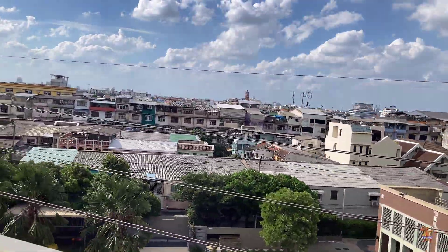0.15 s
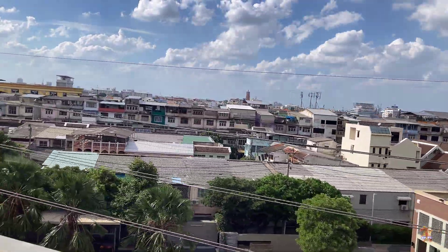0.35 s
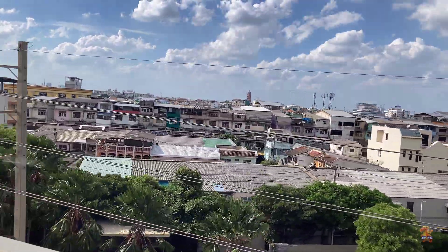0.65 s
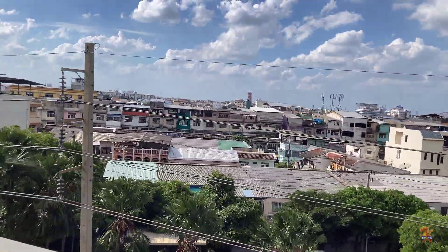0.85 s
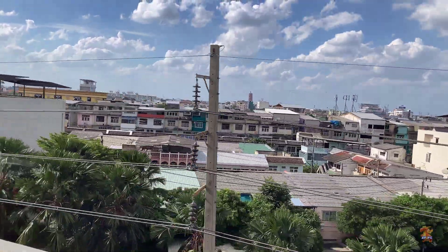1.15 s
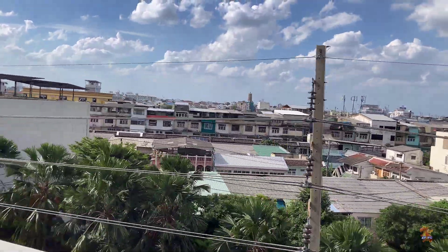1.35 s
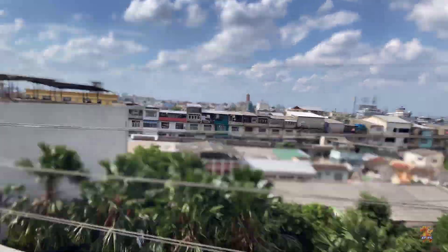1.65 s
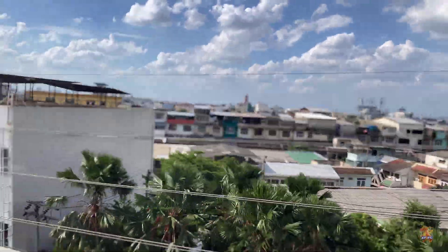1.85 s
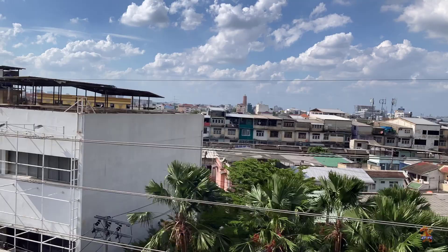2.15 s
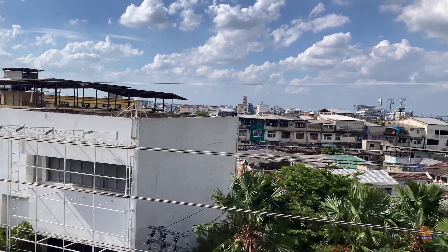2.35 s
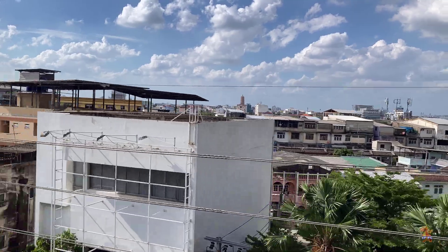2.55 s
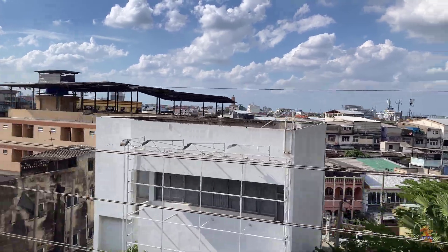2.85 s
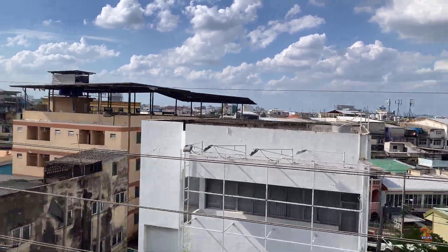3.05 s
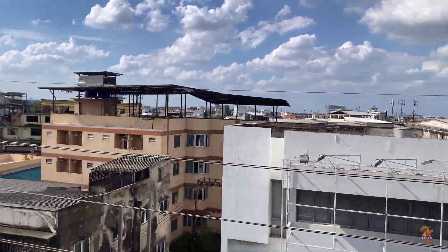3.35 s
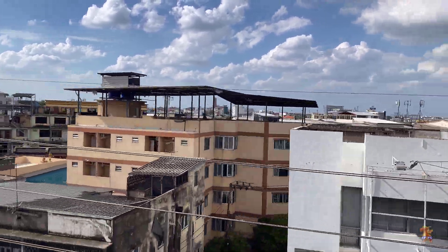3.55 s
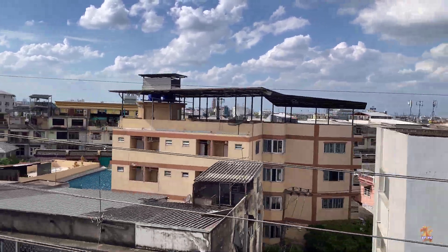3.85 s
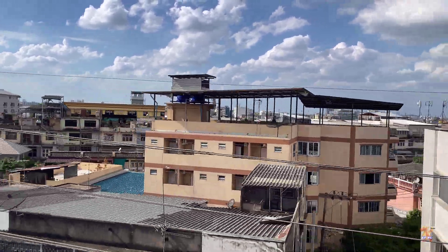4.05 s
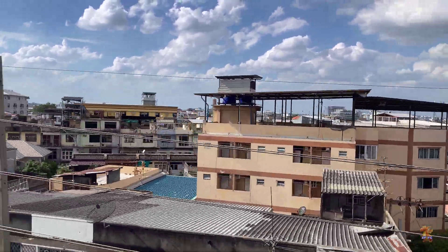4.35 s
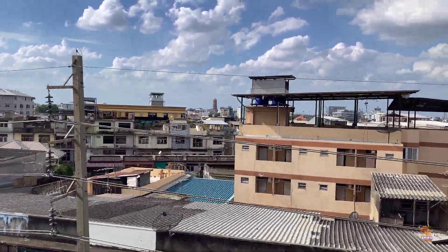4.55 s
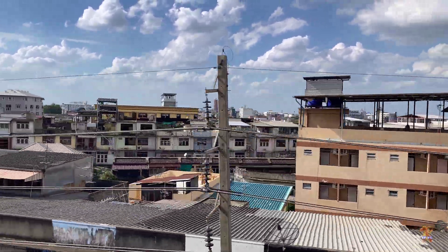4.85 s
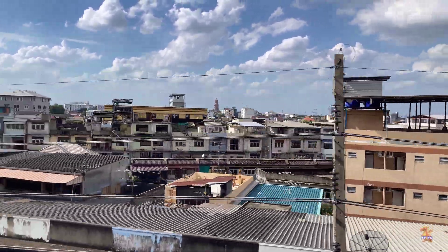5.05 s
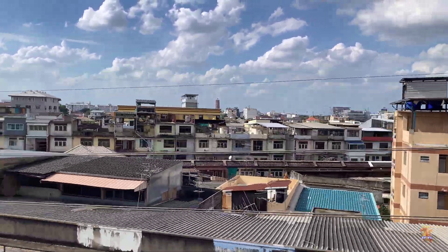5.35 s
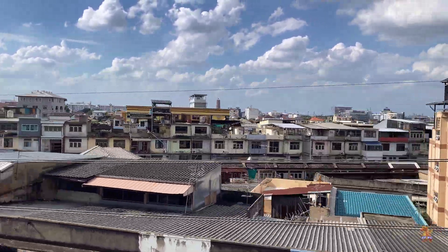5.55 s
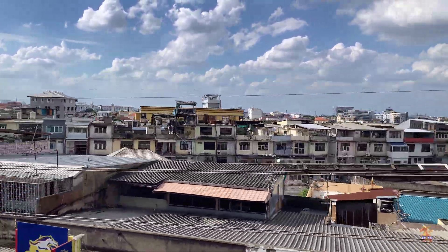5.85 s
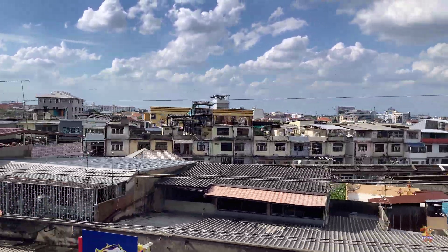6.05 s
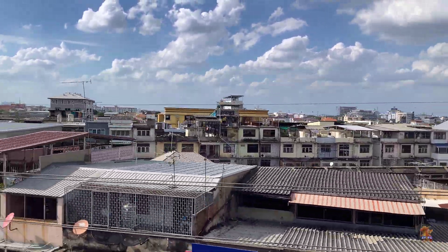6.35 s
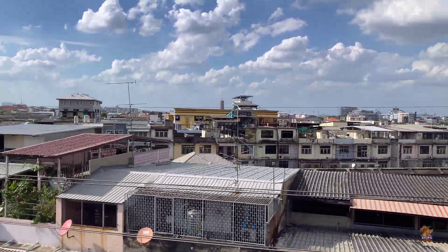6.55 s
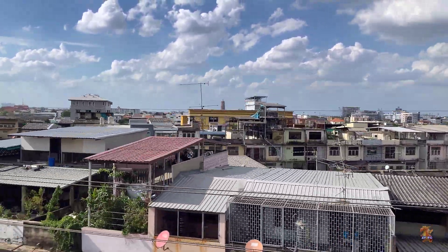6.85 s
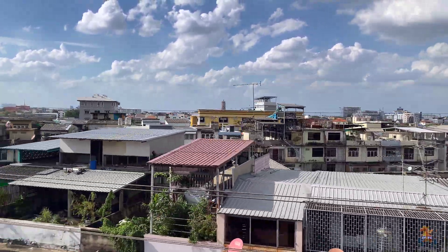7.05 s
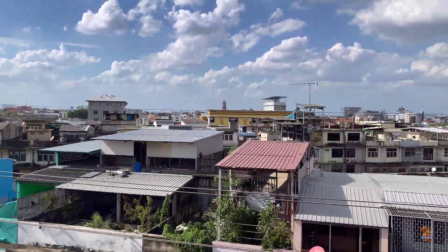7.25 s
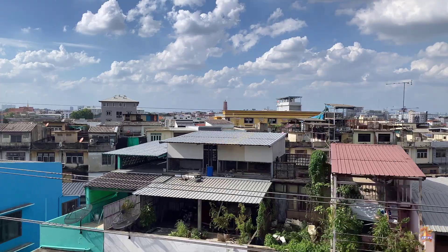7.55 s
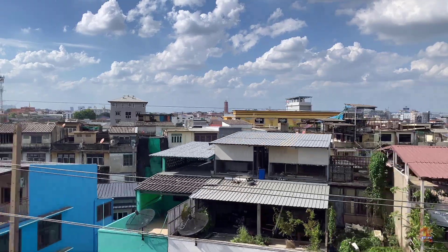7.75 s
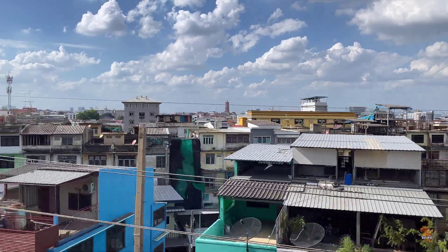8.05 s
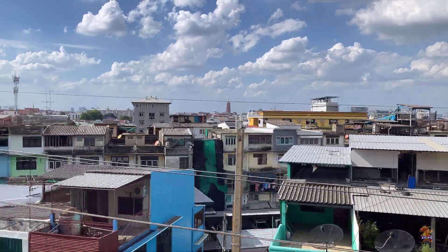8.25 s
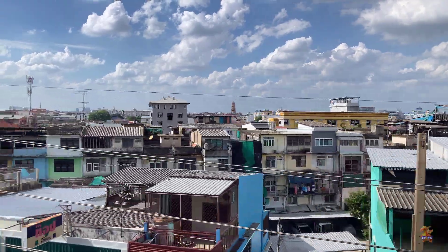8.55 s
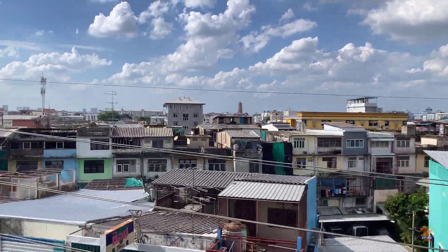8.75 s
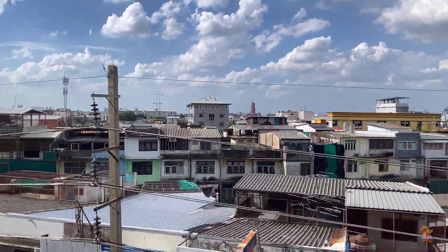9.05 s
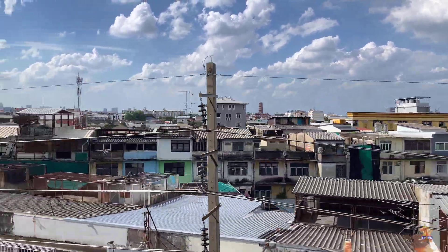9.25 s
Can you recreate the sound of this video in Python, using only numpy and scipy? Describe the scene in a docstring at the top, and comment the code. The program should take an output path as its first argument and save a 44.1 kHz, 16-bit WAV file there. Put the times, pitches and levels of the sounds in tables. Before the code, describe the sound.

Inside a moving elevated train: deep droning floor rumble, soft wheel roar and air hiss, faint motor whine, small trim ticks, and one sharp body knock.

```python
"""The car body of an elevated train rumbles: low noise of floor and panels, with booms, lulls and rough track.
Recorded inside, on a phone held at the window: wheel roar and air hiss are shaped noise around its two ports.
A compressor hums in steady shaft orders; a faint pair of drive tones rises and fades.
Wheels ring as narrow noise and wavering tones, and the running gear rubs in swells of filtered noise.
Up close, trim ticks in noise bursts, plastic snaps in clicks, and the body knocks in single pressure dips."""
import sys
import numpy as np
from scipy import signal
from scipy.fft import rfft, irfft, next_fast_len
from scipy.io import wavfile
from scipy.ndimage import uniform_filter1d

SR = 44100
rng = np.random.default_rng(int(sys.argv[2]) if len(sys.argv) > 2 else 0)


def wav_out(sig):
    """Save sig, one row per channel (or a flat mono array), as 16-bit PCM at SR to the path in sys.argv[1]."""
    wavfile.write(sys.argv[1], SR, np.round(np.clip(np.atleast_2d(sig).T, -1, 1) * 32767).astype(np.int16))


N = 414099
T = np.arange(N) / SR  # time [s]
HZ = np.fft.rfftfreq(N, 1 / SR)  # frequency [Hz]

# Spectra of the running noise in the carriage: (frequency [Hz], relative density [dB])
FLOOR_SPECTRUM = [(15, -14), (35, -26), (43, -16.5), (47, 4), (53, -6.5), (63, 0.3), (73, -5.5), (83, -0.5),
                  (93, -13.5), (130, -29), (400, -120)]
PANEL_SPECTRUM = [(60, -49), (97, 0.5), (130, -0.5), (170, -3.5), (184, -7.5), (207, -7.5), (224, -16),
                  (330, -38), (900, -120)]
WHEEL_SPECTRUM = [(120, -31), (200, -15), (240, 0.5), (275, -3), (322, -0.5), (390, -7.5), (460, -11),
                  (600, -12), (720, -18.5), (830, -15), (950, -29.5), (1500, -38), (4000, -120)]
AIR_SPECTRUM = [(500, -35), (850, -2), (1030, 1), (1300, -3), (1900, -7), (2350, -10.5), (2950, -12),
                (4200, -16), (5200, -19), (7700, -25.5), (8500, -25.5), (12000, -30), (15400, -38.5),
                (16200, -52.5)]
# Floor booms as the car rocks: (time [s], extra level [dB]), with a shared rise and fall
FLOOR_BOOMS = [(.17, 3), (3.6, 2), (4.27, 1.5), (4.93, 4.5), (6.3, 4), (6.93, 3.5), (8.08, 2), (8.85, 2)]
BOOM_S = 0.12
# Brief sinkings of the rumble between its surges: (time [s], floor level change [dB]), shared fall and rise
RUMBLE_LULLS = [(.5, -5), (1.24, -5), (1.61, -2.5), (2.9, -5.5), (5.5, -1.5), (7.22, -2.5), (7.34, -1),
                (7.88, -5), (9.03, -4)]
LULL_S = 0.049
# Rough stretches of track: (roughest time [s], rise [s], fall [s], shaking before each source's share [dB])
ROUGH_STRETCHES = [(2.1, .4, 0.83, 1.8), (3.2, 0.27, 0.26, 2.5), (4.83, 0.41, 0.24, 1.5),
                   (6.32, 0.43, 0.16, 2), (7.3, 1, 0.87, 2.5)]
# Compressor orders between their swells: (multiple of shaft speed [1], level [dB])
HUM_ORDERS = [(3, -37.5), (4, -34), (6, -45)]
# Swells of single orders in the standing waves of the carriage:
# (start [s], end [s], multiple of shaft speed [1], added level [dB])
ORDER_SWELLS = [(0.095, 0.7, 4, -31.5), (1.0, 1.49, 4, -33), (2, 3.6, 3, -45.5), (2.85, 5, 4, -37.5),
                (6.5, 7.2, 4, -37), (7.1, 9.1, 3, -37.5), (7.5, 8.42, 4, -35.5), (.1, 3.3, 6, -45.5)]
SHAFT_HZ = 47.94  # mean shaft speed
# Rubs and swells of the running gear: (time [s], length [s], centre [Hz], width [Hz], level [dB])
GEAR_RUBS = [(.02, .2, 2200, 3200, -50), (.6, 2.1, 680, 220, -44.5), (2.4, 0.75, 356, 130, -38.5),
             (2.92, 0.065, 2600, 350, -48), (3.038, .04, 900, 190, -35), (3.057, 0.053, 2500, 700, -49),
             (3.1, .14, 950, 900, -42), (3.388, 0.092, 480, 130, -39), (4.124, 0.29, 528, 91, -38.5),
             (4.68, 0.22, 1390, 900, -44.5), (4.803, .3, 3400, 2500, -56), (5.2, 0.61, 480, 200, -43),
             (5.547, 0.18, 298, 100, -30.5), (6.356, 0.18, 1500, 1300, -51), (6.36, .15, 560, 400, -39),
             (6.65, .12, 560, 200, -37), (6.7, .2, 1800, 900, -57), (6.787, .16, 690, 250, -39),
             (6.974, 0.12, 2820, 500, -50.5), (7.595, 0.098, 520, 90, -40), (9.004, .35, 2400, 1400, -54),
             (9.33, 0.16, 2240, 500, -45)]
RING_HZ, RING_WIDTH_HZ = 1018, 33  # faint steady wheel ringing
# Drive whine swells: (start [s], end [s], starting level [dB], growth [dB/s])
WHINE_SWELLS = [(.05, 0.45, -46, 14), (0.45, 1.5, -40.4, -6.3), (1.98, 2.25, -51, 10),
                (3.68, 5.74, -48.2, 4.4), (8.15, 8.85, -49, -5), (8.85, 9.39, -44.5, 4)]
# Mean pitch of the first drive motor: (time [s], frequency [Hz])
WHINE_PITCH = [(0, 834), (.45, 845), (1.15, 850), (2.1, 845), (3.8, 835), (4.5, 838), (5.1, 844.5),
               (5.4, 849.5), (5.75, 854), (8.1, 836), (8.8, 838), (9.4, 843)]
SECOND_MOTOR_HZ = 12  # how far the second motor runs below the first
# Clearest ticks of loose trim: (time [s], relative burst level [dB])
CLEAR_TICKS = [(0.0737, -43.5), (0.2748, -42.5), (0.5477, -46), (0.833, -48), (1.3583, -50), (1.6841, -44),
               (1.718, -42), (2.2074, -46), (2.3616, -40), (3.2226, -45), (3.8511, -47), (3.9484, -46),
               (4.8539, -48), (4.9222, -43), (5.2884, -44), (6.1988, -45), (6.3984, -46), (6.9336, -44),
               (7.0833, -41.5), (7.4669, -42.5), (8.3888, -44), (8.6393, -44.5), (8.8355, -46),
               (8.928, -44), (8.9755, -44.5), (9.1487, -45)]
# Range of the random faint ticks: (weakest [dB], strongest [dB]), relative burst levels
FAINT_TICK_RANGE = (-56, -48)
# Colour of the trim ticks: (frequency [Hz], relative level [dB])
TICK_SPECTRUM = [(1000, -2), (2800, 5), (6000, -7), (6750, -2), (7200, 0), (7700, -2.5), (11000, -6),
                 (15400, -13), (16500, -29)]
# Wheels singing out: (start [s], end [s], pitch [Hz], starting level [dB], growth [dB/s],
# roughness [0-1], left minus right [dB], phase by which left leads [rad])
WHEEL_SONGS = [(1.41, 1.72, 1027, -45.5, 6, .3, -3, -2.2), (3.12, 4.55, 620, -47, -1.6, .4, 8, -1.5),
               (4.66, 4.79, 1020, -42.5, 0, .6, 1, 2.2), (7.92, 8.2, 1010, -46.5, -10, .6, 4, 2.2)]
# Dull knocks of the car body: (time [s], relative peak [dB], pitch [Hz])
BODY_KNOCKS = [(1.7195, -23, 400), (1.7233, -8.5, 225), (1.734, -6.5, 80), (2.849, -13, 219),
               (3.056, -11, 110), (3.075, -17, 267), (5.115, -13, 231), (6.325, -16, 240),
               (7.594, -19, 220), (8.837, -16.5, 259)]
# Crackle of plastic close by: (time [s], relative level [dB])
PLASTIC_SNAPS = [(1.7236, -29), (1.7351, -18.5), (1.763, -37), (1.776, -36), (1.7874, -32), (1.799, -32.5)]
# Colour of the plastic snaps: (frequency [Hz], relative level [dB])
SNAP_SPECTRUM = [(1000, -10), (2700, -5), (5000, -4), (7500, -4), (9300, 1), (11200, 5), (15400, 1),
                 (17000, -9)]
# Likeness of the two microphone ports: (frequency [Hz], likeness [0-1])
PORT_LIKENESS = [(60, .989), (120, .97), (190, .9), (300, .8), (420, .72), (530, 0), (700, 0), (800, .45),
                 (1050, .5), (1700, .4), (2100, .2), (2300, 0), (6350, 0), (6800, .95)]
# Phase between the ports, used below 4 kHz for noise: (frequency [Hz], phase by which left leads [rad])
PORT_LEAD = [(40, .22), (65, .27), (100, .18), (220, .12), (350, .6), (560, 1.1), (850, 1.7), (1020, 3.75),
             (2000, 4.1)]
# Level between the ports: (frequency [Hz], left minus right [dB])
PORT_BALANCE = [(60, -1.6), (150, -.8), (290, 0), (370, -2.5), (540, 4), (850, 2), (1020, .5), (1400, 2.7),
                (2200, .7), (8000, 0)]
PORT_LAG_S = .00022  # lag between the ports in the treble
EDGE_HZ = 16500  # upper band edge of the phone


def gain_of(db):
    """Decibels to an amplitude factor."""
    return 10 ** (np.asarray(db) / 20)


def evened(x):
    """Scales to an rms of 1."""
    return x / np.sqrt(np.mean(x ** 2) + 1e-20)


def read(points, hz=HZ):
    """Reads a spectrum table on a log-frequency axis."""
    f, value = np.transpose(points)
    return np.interp(np.log(hz + 1), np.log(f + 1), value)


def coloured(x, gain):
    """Filters by a gain given at every frequency."""
    size = next_fast_len(N)
    hz = np.fft.rfftfreq(size, 1 / SR)
    return irfft(rfft(x, size) * np.interp(hz, HZ, gain), size)[..., :N]


def drift(rate_hz):
    """Smooth random wandering of rms 1."""
    knots = rng.standard_normal(4000)
    knots = uniform_filter1d(uniform_filter1d(knots, size=4), size=4)
    return evened(np.interp(T * rate_hz * 8, np.arange(4000), knots))


def swell(peak_s, rise_s, fall_s):
    """A smooth rise to 1 and a smooth fall."""
    away = (T - peak_s) / np.where(T < peak_s, rise_s, fall_s)
    return np.exp(-np.minimum(away ** 2, 20))


def held(start_s, end_s, db, db_per_s, edge_s):
    """A tone's envelope: soft attack, a hold that grows or sinks steadily, soft release."""
    gate = (1 + np.tanh(np.minimum(T - start_s, end_s - T) / edge_s)) / 2
    return gate * gain_of(db + db_per_s * (np.clip(T, start_s, end_s) - start_s))


def noise(db):
    """Two unrelated noises with the given spectrum, together of rms 1."""
    return evened(coloured(rng.standard_normal((2, N)), gain_of(db)))


def band(hz, width_hz):
    """Noise ringing in one resonance."""
    offset = (HZ - hz) / (0.63 * width_hz)
    return noise(-20 * np.log10(1 + offset ** 2))


def steadied(x, steadiness):
    """Evens out the slow swings of a narrow noise, as in a vibration that is driven without pause."""
    power = uniform_filter1d(uniform_filter1d(x ** 2, size=4000), size=3000)
    return evened(x / power ** (min(steadiness, 1) / 2))


def patchy(x, patchy_db):
    """Small patches of pitch and time swell and sink on their own."""
    z = signal.stft(x, nperseg=1024, noverlap=768)[2]
    patches = rng.standard_normal(z.shape[1:])
    patches = uniform_filter1d(patches, size=4, axis=0)  # across pitch
    patches = evened(uniform_filter1d(patches, size=14, axis=1))  # across time
    x = signal.istft(z * gain_of(patchy_db * patches), nperseg=1024, noverlap=768)[1]
    return evened(x[:, :N])


def placed(hz, lean_db, lead):
    """A line on a pitch curve, reaching each port with its own phase and level."""
    phase = 2 * np.pi * (np.cumsum(hz) / SR + rng.random())
    lean = gain_of(lean_db / 2)
    return np.sqrt(2) * np.array([lean * np.cos(phase), np.cos(phase - lead) / lean])


def tone(hz, db):
    """A line that fills the carriage, with the port balance and phase of its mean pitch."""
    centre = np.mean(hz)
    return gain_of(db) * placed(hz, read(PORT_BALANCE, centre), read(PORT_LEAD, centre))


def bursts(rows, colour, decay_s):
    """Each contact is a burst of noise that dies quickly."""
    envelope = np.zeros(N)
    for s, db in rows:
        start = round(s * SR)
        since = T[start:][:SR // 10] - start / SR
        envelope[start:][:len(since)] += gain_of(db) * np.exp(-since / decay_s)
    return noise(read(colour)) * envelope


def shaking():
    """Extra decibels of vibration from the state of the track."""
    return sum(db * swell(s, rise, fall) for s, rise, fall, db in ROUGH_STRETCHES)


def rumble(floor_db=-20.5, floor_db_per_s=-0.2, surge_db=0.74, panels_db=-24.5,
           panels_follow=1.16, panels_lull=0.37, steadiness=0.47):
    """The floor drones, booms and sinks between surges; the wall panels drone harder on rough track."""
    booms = sum(db * swell(s, BOOM_S, BOOM_S) for s, db in FLOOR_BOOMS)
    lulls = sum(db * swell(s, LULL_S, LULL_S) for s, db in RUMBLE_LULLS)
    floor_level = floor_db + floor_db_per_s * T + booms + lulls + surge_db * drift(7.4)
    panels_level = panels_db + panels_follow * shaking() + panels_lull * lulls
    floor = steadied(noise(read(FLOOR_SPECTRUM)), steadiness) * gain_of(floor_level)
    panels = steadied(noise(read(PANEL_SPECTRUM)), steadiness) * gain_of(panels_level)
    return floor + panels


def carriage(x, ripple_db=.9, fade_hz=6000):
    """Wall reflections leave shallow fixed peaks and dips, different at each port and fading in the treble."""
    knots_hz = np.arange(0, SR / 2, 10)
    depth_db = ripple_db / (1 + (HZ / fade_hz) ** 4)
    sides = []
    for side in x:
        ripple = evened(np.interp(HZ, knots_hz, rng.standard_normal(len(knots_hz))))
        sides.append(coloured(side, gain_of(depth_db * ripple)))
    return evened(np.array(sides))


def rolling(wheels_db=-32, wheels_follow=0.89, wheels_db_per_s=-0.0042, air_db=-42, air_follow=0.032,
            air_db_per_s=0.05, flutter_db=0.7, roar_patchy_db=1.73, air_patchy_db=1.5):
    """The wheels roar with the track; air and rolling hiss flutter above them and grow very slightly."""
    shake = shaking()
    wheels_level = wheels_db + wheels_db_per_s * T + wheels_follow * shake
    air_level = air_db + air_follow * shake + air_db_per_s * T + flutter_db * drift(16)
    wheels = patchy(noise(read(WHEEL_SPECTRUM)), roar_patchy_db)
    air = carriage(patchy(noise(read(AIR_SPECTRUM)), air_patchy_db))
    return wheels * gain_of(wheels_level) + air * gain_of(air_level)


def compressor(wander=0.0055, waver_db=3, edge_s=0.22):
    """Orders of one nearly steady shaft; each wavers, swells and sinks on its own."""
    speed, out = SHAFT_HZ * (1 + wander * drift(6)), 0
    for order, rest_db in HUM_ORDERS:
        swells = sum(held(start, end, db, 0, edge_s) for start, end, k, db in ORDER_SWELLS if k == order)
        out = out + tone(order * speed, waver_db * drift(18)) * (gain_of(rest_db) + swells)
    return out


def running_gear(ring_db=-54.5, steadiness=0.31):
    """The rail keeps a wheel mode ringing; rubs swell and die as bands of friction noise."""
    out = steadied(band(RING_HZ, RING_WIDTH_HZ), steadiness) * gain_of(ring_db)
    friction = rng.standard_normal((2, N))
    for s, length, hz, width_hz, db in GEAR_RUBS:
        near = abs(T - s) < 2 * length
        edges = [max(hz - width_hz / 2, hz / 2), hz + width_hz / 2]
        sos = signal.butter(2, edges, "bandpass", fs=SR, output="sos")
        rub = evened(signal.sosfilt(sos, friction[:, near]))
        out[:, near] += rub * gain_of(db) * swell(s, length / 2, length / 2)[near]
    return out


def drive(second_db=-10, wander=0.0026, waver_db=2.2, throb=0.12, throb_hz=7.7, edge_s=0.06):
    """Two motors whine close together, beating, and throb as the axle turns."""
    hz = np.interp(T, *np.transpose(WHINE_PITCH))
    first = tone(hz * (1 + wander * drift(40)), waver_db * drift(40))
    second_hz = (hz - SECOND_MOTOR_HZ) * (1 + wander * drift(40))
    second = tone(second_hz, second_db + waver_db * drift(40))
    level = sum(held(start, end, db, growth, edge_s) for start, end, db, growth in WHINE_SWELLS)
    throbbing = 1 + throb * np.sin(2 * np.pi * throb_hz * T + drift(1.5))
    return (first + second) * level * throbbing


def trim(tick_db=0.3, count=24):
    """Loose trim ticks in short noise bursts: clear contacts, and faint ones at random times."""
    faint = [(rng.uniform(0, T[-1]), rng.uniform(*FAINT_TICK_RANGE)) for _ in range(count)]
    return gain_of(tick_db) * bursts(CLEAR_TICKS + faint, TICK_SPECTRUM, decay_s=0.01)


def singing(wander=0.012, waver_db=6, edge_s=0.033):
    """Wheels sing out from their own directions; roughness makes pitch and level waver more."""
    bend, waver, out = wander * drift(30), waver_db * drift(24), 0
    for start, end, hz, db, growth, rough, lean_db, lead in WHEEL_SONGS:
        line = placed(hz * (1 + rough * bend), lean_db, lead) * evened(gain_of(rough * waver))
        out = out + line * held(start, end, db, growth, edge_s)
    return out


def knocks(knock_db=-1):
    """A single push of the panels: one pressure dip with a rebound on either side."""
    out = np.zeros(N)
    for s, db, hz in BODY_KNOCKS:
        near = abs(T - s) < 2 / hz
        u = (np.pi * hz * (T[near] - s)) ** 2
        out[near] += gain_of(db + knock_db) * (2 * u - 1) * np.exp(-u)
    return out


def crackle(click_db=5.5, scatter_db=-13, ring_db=-12.5, ring_hz=2650, ring_s=0.0015):
    """Dry snaps of plastic: each is one click, a little scatter and a dull, quickly damped clunk."""
    t, hits = T[:SR // 20], np.zeros(N)
    for s, db in PLASTIC_SNAPS:
        hits[round(s * SR)] = gain_of(db)
    click = coloured(hits, evened(gain_of(read(SNAP_SPECTRUM))))
    clunk = np.sin(2 * np.pi * ring_hz * t) * np.exp(-t / ring_s)
    ring = signal.oaconvolve(hits, clunk)[:N]
    scatter = bursts(PLASTIC_SNAPS, SNAP_SPECTRUM, decay_s=.0012)
    return gain_of(click_db) * click + gain_of(ring_db) * ring + gain_of(scatter_db) * scatter


def ports(pair):
    """Two unrelated signals become the two channels: alike in the bass, opposed in polarity in the treble, the
    right one slightly ahead."""
    same = np.clip(read(PORT_LIKENESS), 0, 1)
    lead = np.where(HZ < 4000, read(PORT_LEAD), np.pi - 2 * np.pi * HZ * PORT_LAG_S)
    shared = coloured(pair[0], same * np.exp(-1j * lead))
    own = coloured(pair[1], np.sqrt(1 - same ** 2))
    lean = gain_of(read(PORT_BALANCE) / 2)
    return np.array([coloured(pair[0], lean), coloured(shared + own, 1 / lean)])


def scene():
    """Noise, ticks and snaps pass through the port model; tones and knocks join after it."""
    through_ports = rumble() + rolling() + running_gear() + trim() + crackle()
    return ports(through_ports) + compressor() + drive() + singing() + knocks()


def record(dry):
    """The band limit of the phone, a steep low-pass."""
    lowpass = signal.firwin(511, EDGE_HZ, window=("kaiser", 9), fs=SR)
    return signal.oaconvolve(dry, lowpass[None], "same")


dry = scene()
out = record(dry)
wav_out(out)
```